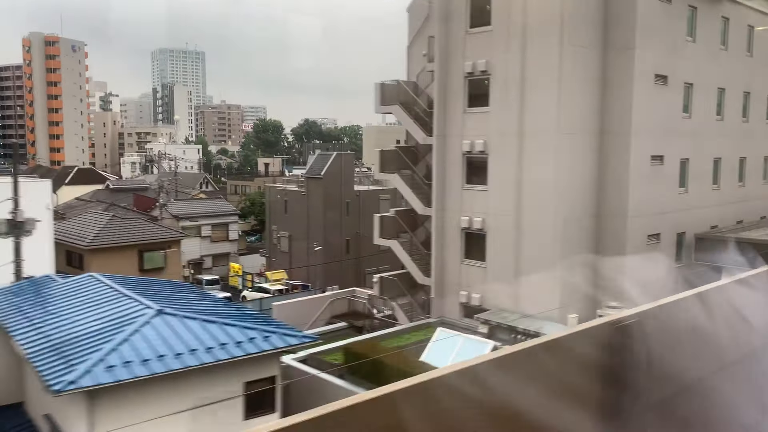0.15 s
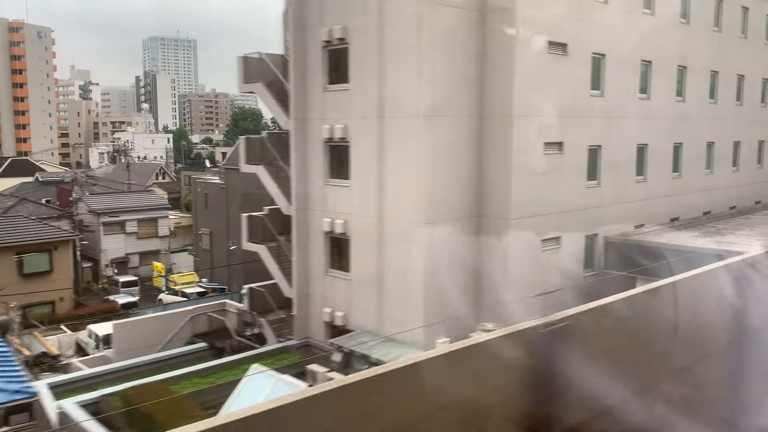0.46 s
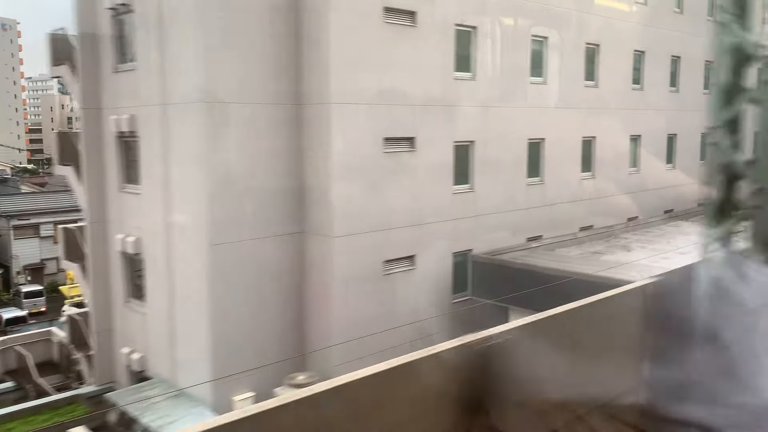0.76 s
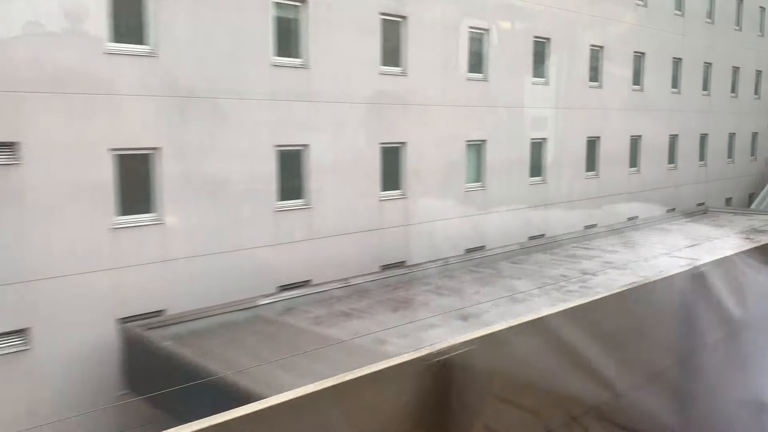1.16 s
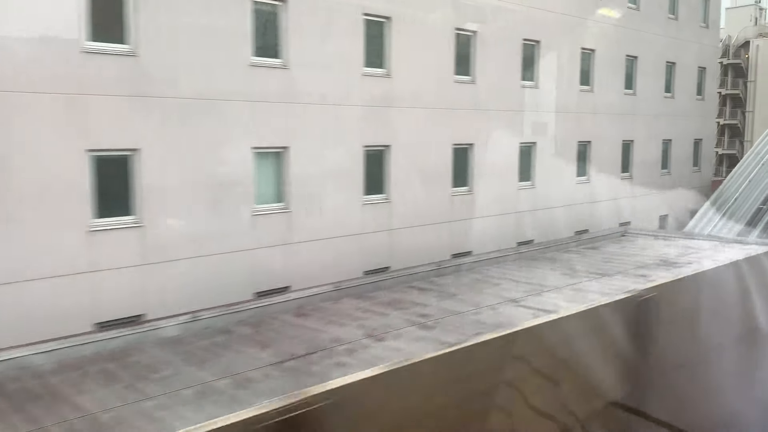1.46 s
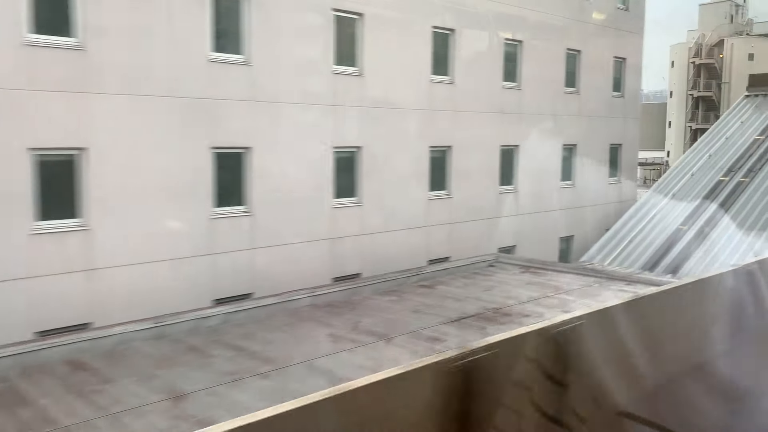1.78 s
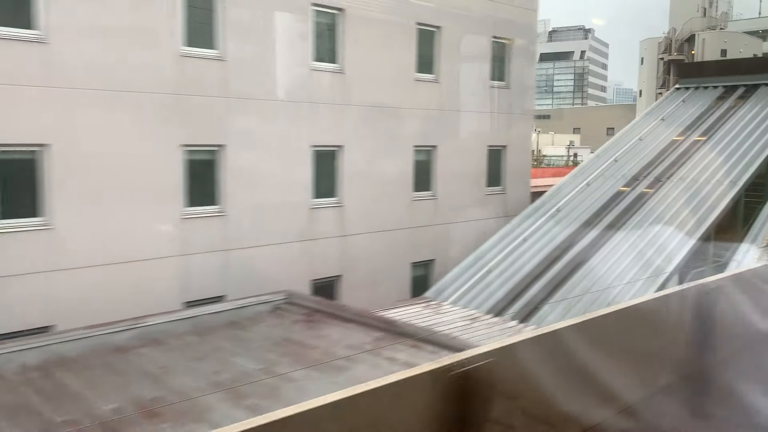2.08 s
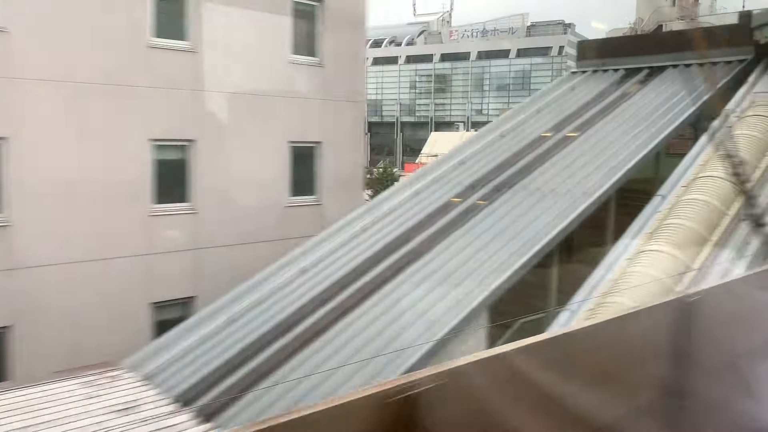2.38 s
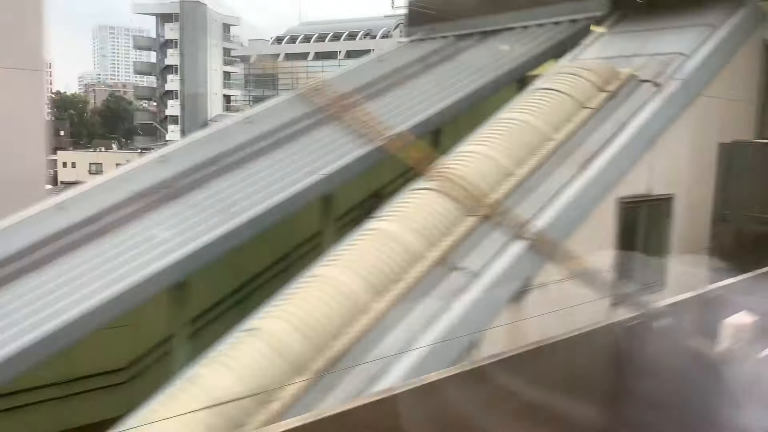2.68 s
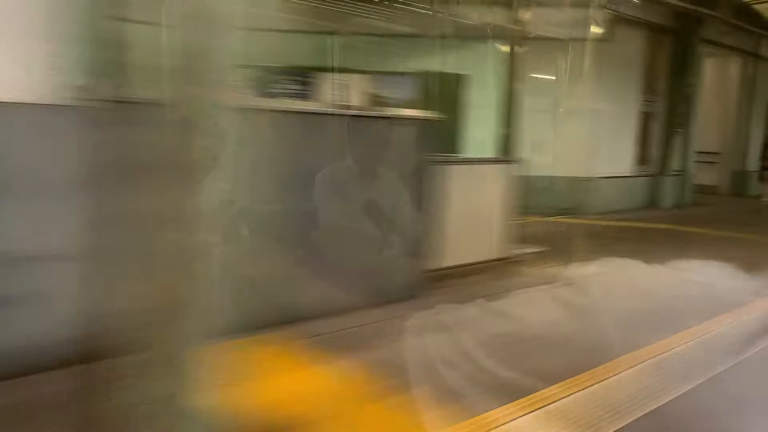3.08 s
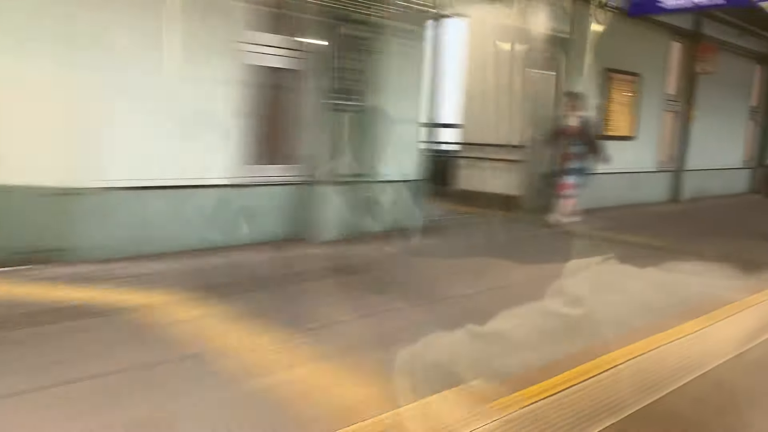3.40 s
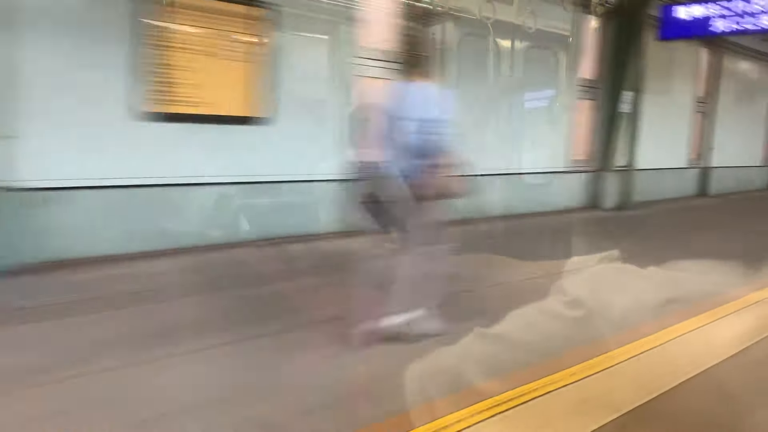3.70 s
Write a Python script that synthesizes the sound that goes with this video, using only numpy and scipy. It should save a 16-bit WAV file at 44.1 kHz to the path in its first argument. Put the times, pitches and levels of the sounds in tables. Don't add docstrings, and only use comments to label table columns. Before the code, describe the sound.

A deep rolling train roar with bumpy floor thuds, heard by a window in the carriage; brief swells beside walls, a faint rail hiss midway, then louder along the platform. Close cloth rustles and ticks, stereo.

```python
import sys
import numpy as np
from scipy import signal
from scipy.fft import rfft, irfft, next_fast_len
from scipy.io import wavfile
from scipy.ndimage import uniform_filter1d, map_coordinates

SR = 44100
rng = np.random.default_rng(int(sys.argv[2]) if len(sys.argv) > 2 else 0)


def magnitude_from_level(level_db):
    exponent = np.asarray(level_db, float) / 20
    return 10 ** exponent


def materialize(psi):
    bounded = np.clip(np.atleast_2d(psi).T, -1, 1)
    quanta = np.round(bounded * 32767).astype(np.int16)
    wavfile.write(sys.argv[1], SR, quanta)


N = 169785

FLOOR_PAN = magnitude_from_level(-1.2 * np.array([[.5], [-.5]]))


def unit(x):
    return x / np.sqrt(np.mean(x ** 2) + 1e-20)


def along(points, hz):
    f, v = np.transpose(points)
    return np.interp(np.log(hz + 1), np.log(f + 1), v)


def wobble(rate):
    knots = rng.standard_normal(int(N * rate / SR) + 4)
    return map_coordinates(knots, [np.arange(N) * rate / SR])


def filtered(x, response):
    m = next_fast_len(N + SR // 2)
    return irfft(rfft(x, m) * response(np.fft.rfftfreq(m, 1 / SR)), m)[..., :N]


def coloured(x, spectrum):
    return unit(filtered(x, lambda hz: magnitude_from_level(along(spectrum, hz))))


def hump(mid_s, half_s):
    return np.exp(-((np.arange(N) / SR - mid_s) / half_s) ** 2)


def slow_rise(t, rise_s):
    return 1 - np.exp(-(t / rise_s) ** 2)


def rush(spectrum, patchy_db, alike):
    # (frequency [Hz], width [Hz], gain [dB])
    panels = [
        (288, 23, 3.5),
        (411, 13, 1),
        (700.7, 34, 6),
        (958, 160, 1.5),
        (1379, 75, 8),
        (2002, 230, 5),
        (2790, 250, 5),
    ]
    # (frequency [Hz], left minus right [dB])
    pan = [(60, -2), (130, -2), (290, 3.5), (640, 2), (1410, 0.7), (3100, 1), (6820, -4), (15000, 0.0)]
    z = signal.stft(rng.standard_normal((2, N)), nperseg=512)[2]
    field = uniform_filter1d(rng.standard_normal(z.shape[1:]), 4, 0)
    field = uniform_filter1d(field, 8, 1)
    pair = signal.istft(z * magnitude_from_level(patchy_db * unit(field)), nperseg=512)[1][:, :N]

    def mid_side(hz):
        turn = np.arccos(np.clip(along(alike, hz), -1, 1)) / 2
        ringing = sum(db / (1 + (2 * (hz - c) / w) ** 2) for c, w, db in panels)
        return magnitude_from_level(along(spectrum, hz) + ringing) * [np.cos(turn), np.sin(turn)]

    mid, side = filtered(pair, mid_side)
    stereo = np.array([mid + side, mid - side])
    return unit(filtered(stereo, lambda hz: magnitude_from_level(along(pan, hz) * [[.5], [-.5]])))


def aside(x, other):
    lag_s, alike = .000146, .9
    lag = lambda hz: np.exp(-1j * np.pi * hz * lag_s * np.array([[1], [-1]]))
    return filtered(np.array([x, alike * x + np.sqrt(1 - alike ** 2) * other]), lag)


def rolling():
    # (time [s], roar level [dB], brightness [dB])
    surroundings = [(0, -35, 1), (.16, -36.5, -1), (.43, -35, -.5), (.53, -30.5, 1.5), (.7, -30.5, 2.5),
                    (.76, -33, 1), (.86, -29.5, 0), (.97, -33.5, -.5), (1.14, -33.5, 0), (1.5, -35.5, -.5),
                    (2.0, -34.5, -.5), (2.2, -32, 0), (2.62, -30, -.5), (2.85, -26.5, 0), (3.28, -26, 0),
                    (3.46, -28, 0), (3.66, -27, .5), (3.85, -26.5, 1)]
    # (frequency [Hz], density [dB per Hz])
    boom_spectrum = [(12, -40), (23, 1.5), (35, -6), (55, 6), (85, 2.5), (150, -6), (240, -29.5),
                     (500, -120)]
    roar_spectrum = [(70, -60.5), (140, -6), (290, -6), (390, -5.5), (650, -10.5), (800, -11),
                     (1300, -37.5), (2800, -120)]
    hiss_spectrum = [(400, -77), (900, 7.5), (1250, -4), (1750, -8.5), (2550, -12.5), (4400, -21.5),
                     (5600, -30), (12000, -120)]
    # (frequency [Hz], correlation [-1 to 1])
    alike = [(60, .98), (160, .9), (270, .8), (450, .1), (740, -.3), (1220, 0), (3330, .04), (9000, .3)]
    boom_alike = [(60, .985), (130, .94), (290, .7)]
    s, *cols = np.transpose(surroundings)
    level, bright = (np.interp(np.arange(N) / SR, s, c) for c in cols)
    swing, shake = level - level.mean(), wobble(9.125)
    boom_db = -26.5 + 0.2 * swing + wobble(3.9)
    roar_db = 2.5 + level + 0.78 * shake
    hiss_db = -38.5 + bright + 0.28 * swing + 0.62 * shake + 0.25 * wobble(7.1)
    boom = magnitude_from_level(boom_db) * rush(boom_spectrum, 0.6, boom_alike)
    roar = magnitude_from_level(roar_db) * rush(roar_spectrum, 1.5, alike)
    hiss = magnitude_from_level(hiss_db) * rush(hiss_spectrum, 1.63, alike)
    return boom + roar + hiss


def bumps():
    # (time [s], peak level [dB], pitch [Hz])
    shocks = [(0.02, -17, 48.4), (0.136, -16.5, 46.7), (0.243, -12, 75.5), (0.33, -23, 40),
              (0.428, -15.5, 82.2), (0.516, -13, 79.5), (0.628, -9.5, 47.8), (0.756, -15.5, 62.4),
              (0.866, -11.5, 82.4), (0.998, -14.5, 87), (1.074, -16, 43.1), (1.139, -18.5, 63.4),
              (1.269, -20, 78), (1.34, -16.5, 62), (1.389, -16.5, 61.7), (1.47, -19.5, 72),
              (1.508, -13.5, 61.9), (1.62, -16.5, 37.7), (1.668, -17, 75), (1.76, -11, 57.6),
              (1.808, -19, 51.6), (1.877, -11, 55.7), (1.931, -23, 51.6), (2.0, -13, 64.2),
              (2.124, -11.5, 50.8), (2.189, -17, 57), (2.249, -13.5, 52.4), (2.341, -15, 62.3),
              (2.48, -10, 57.5), (2.529, -16, 45.2), (2.585, -14, 47.7), (2.676, -14.5, 48),
              (2.814, -25, 56.5), (2.899, -10, 58), (2.941, -18, 61.9), (3.027, -11.5, 54.8),
              (3.13, -18, 59.2), (3.169, -19, 90), (3.239, -8.5, 55.7), (3.31, -20, 50.5), (3.37, -11, 58),
              (3.407, -7, 55.2), (3.488, -21.5, 47.3), (3.568, -13, 60), (3.629, -16, 69),
              (3.697, -22, 59.2), (3.769, -16, 77.4)]
    # (ratio to the bump's pitch, level [dB], t60 [s])
    modes = [
        (0.984, -0.5, 0.24),
        (1.45, -7, 0.14),
        (.7, -10, 0.37),
    ]
    out, t = np.zeros(N + SR), np.arange(SR // 2) / SR
    chance = rng.random((len(shocks), len(modes), 2))
    for (s, db, pitch), row in zip(shocks, chance):
        ring = 0
        for (ratio, mode_db, t60), (strength, phase) in zip(modes, row):
            decay = magnitude_from_level(mode_db + 6 * (strength - .5) - 60 * t / t60)
            ring = ring + decay * np.sin(2 * np.pi * (ratio * pitch * t + phase))
        out[max(round(s * SR), 0):][:len(t)] += magnitude_from_level(db + 3) * ring * slow_rise(t, 0.014)
    return out[:N] * FLOOR_PAN


def hum():
    # (frequency [Hz], width [Hz], level [dB])
    floor_tone = (49, 3.5, -28)
    hz, width, db = floor_tone
    tone = np.sin(2 * np.pi * np.cumsum(hz + width / 2 * wobble(2.3)) / SR)
    return magnitude_from_level(db + 2.2 * wobble(3)) * FLOOR_PAN * tone


def cloth():
    # (middle [s], half length [s], level [dB])
    strokes = [(0.01, 0.043, -74), (0.381, 0.063, -63), (0.685, 0.12, -46.5), (1.046, 0.12, -51),
               (1.231, .03, -65), (1.378, 0.072, -61), (1.535, 0.036, -52.5), (1.738, 0.12, -46.5),
               (1.98, 0.054, -61.5), (2.138, 0.095, -49.5), (2.32, 0.076, -66), (2.564, 0.066, -60.5),
               (2.744, 0.19, -64.5), (2.921, 0.025, -56.5), (3.382, 0.053, -61), (3.727, 0.033, -51)]
    # (frequency [Hz], density [dB per Hz])
    brush_spectrum = [(300, -120), (1500, -10), (4000, 3), (5800, -8), (8300, -3), (11000, 5),
                      (13000, -10.5), (15600, -10.5)]
    rest_spectrum = [(1000, -120), (4000, -9), (5500, -6), (7000, -2), (8500, -2.5), (11000, -8.5),
                     (13000, -20), (15600, -24.5)]
    stroke = sum(magnitude_from_level(db) * hump(s, half) for s, half, db in strokes)
    grain = magnitude_from_level(1.4 * wobble(400) + .8 * wobble(25))
    brushing = coloured(grain * rng.standard_normal((2, N)), brush_spectrum) * stroke
    resting = coloured(grain * rng.standard_normal((2, N)), rest_spectrum) * magnitude_from_level(-65.5 + wobble(8.3))
    return aside(*(brushing + resting))


def knocks():
    # (time [s], level [dB], frequency [Hz])
    blows = [(1.755, -30, 500), (1.88, -31, 480), (2.01, -30, 510), (2.105, -30, 240), (2.2, -33, 230),
             (.68, -31, 300), (.77, -30, 270), (.81, -30, 390), (.845, -30, 320), (.885, -28, 307),
             (2.54, -34, 293), (2.592, -34, 307), (2.85, -29, 390), (3.1, -29, 290), (3.29, -29, 290),
             (3.79, -27, 185)]
    out, t = np.zeros(N + SR), np.arange(SR // 2) / SR
    t60_s = .22
    for s, db, hz in blows:
        ring = np.sin(2 * np.pi * hz * t) + .6 * np.sin(2 * np.pi * 1.09 * hz * t)
        out[round(s * SR):][:len(t)] += magnitude_from_level(db + 8 - 60 * t / t60_s) * ring * slow_rise(t, .02)
    return out[:N] * FLOOR_PAN


def ticks():
    # (time [s], level [dB], t60 [s])
    snaps = [
        (.9642, -30, 0.02),
        (.9665, -39, .08),
        (1.079, -54.5, 0.037),
        (1.216, -62, .05),
        (1.531, -60, 0.024),
        (2.636, -47, 0.025),
        (2.911, -62.5, .02),
        (3.716, -52.5, 0.018),
    ]
    # (frequency [Hz], density [dB per Hz])
    snap_spectrum = [(300, -120), (1200, 2), (2900, 9), (4500, 4), (6200, -8), (8600, -1), (13800, 0),
                     (16000, -12)]
    t, rise_s = np.arange(N) / SR, 0.00023
    shape = 0
    for s, db, t60 in snaps:
        decay = magnitude_from_level(db - 60 * np.maximum(t - s, 0) / t60)
        shape = shape + decay * np.clip((t - s) / rise_s, 0, 1)
    return aside(*(coloured(rng.standard_normal((2, N)), snap_spectrum) * shape))


def flange():
    # (middle [s], half length [s], frequency [Hz], level [dB])
    strands = [
        (2.33, .16, 3480, -60),
        (2.27, .1, 4160, -60),
        (2.43, .1, 4120, -59),
        (2.26, .12, 4540, -62),
        (2.22, .1, 5050, -64),
    ]
    width_hz, out = 80, 0
    for s, half, hz, db in strands:
        band = lambda f: 1 / (1 + (2 * (f - hz) / width_hz) ** 2)
        strand = unit(filtered(rng.standard_normal((2, N)), band))
        out = out + hump(s, half) * magnitude_from_level(db + 1.2 * wobble(25)) * strand
    return out


def scene():
    return rolling() + bumps() + hum() + cloth() + knocks() + ticks() + flange()


def roll_off(x):
    return signal.sosfilt(signal.butter(12, 15770, fs=SR, output="sos"), x)


def record(dry):
    # (frequency [Hz], width [Hz], depth [dB])
    sum_dips = [
        (10400, 1900, -26),
    ]
    difference_dips = [
        (7600, 800, -7),
        (13700, 1300, -20),
        (10300, 4000, -4),
    ]
    top_hz = 15770

    def thinned(x, dips):
        loss = lambda hz: sum(db / (1 + (2 * (hz - c) / w) ** 6) for c, w, db in dips)
        return filtered(x, lambda hz: (hz < top_hz) * magnitude_from_level(loss(hz)))

    mid = thinned(dry[0] + dry[1], sum_dips) / 2
    side = thinned(dry[0] - dry[1], difference_dips) / 2
    return roll_off(np.array([mid + side, mid - side]))


dry = scene()
out = record(dry)
materialize(out)
```